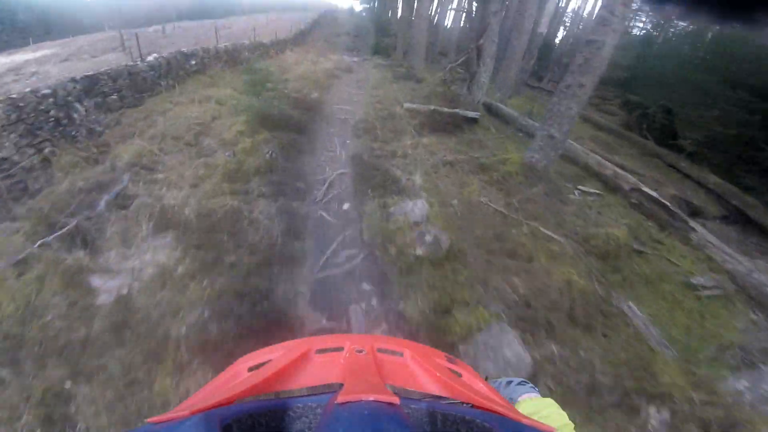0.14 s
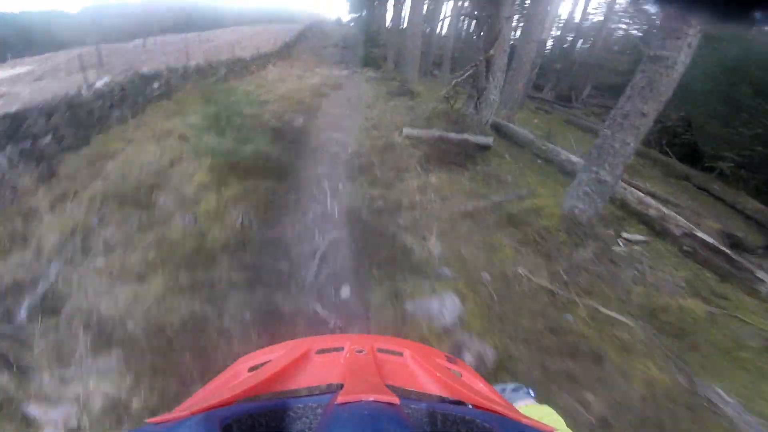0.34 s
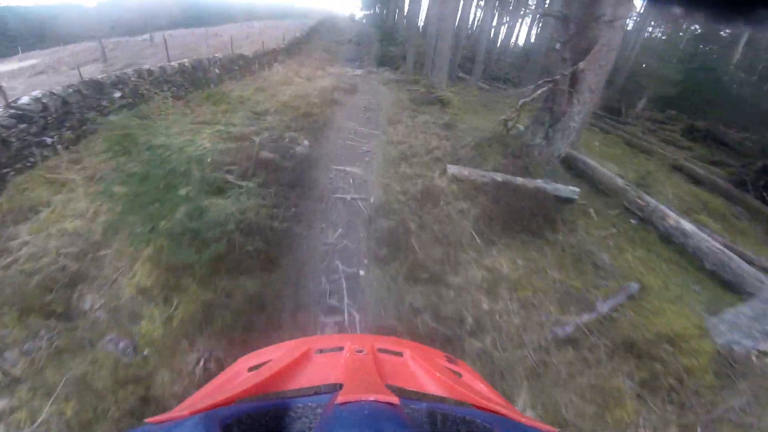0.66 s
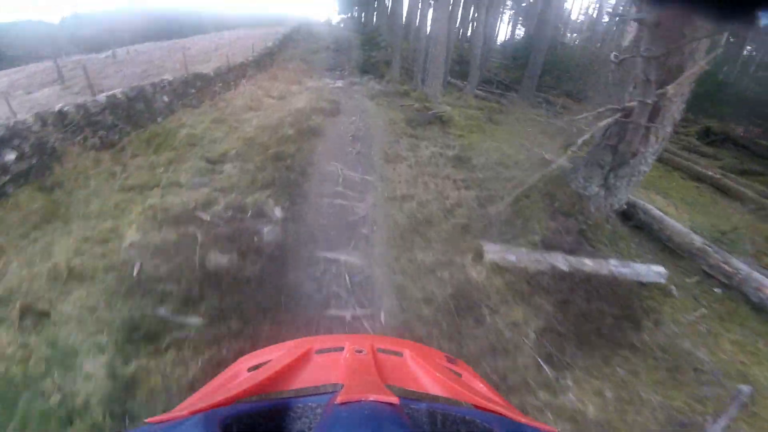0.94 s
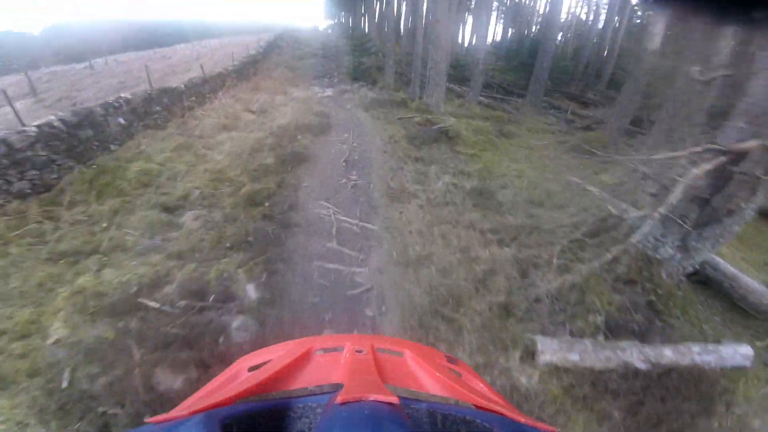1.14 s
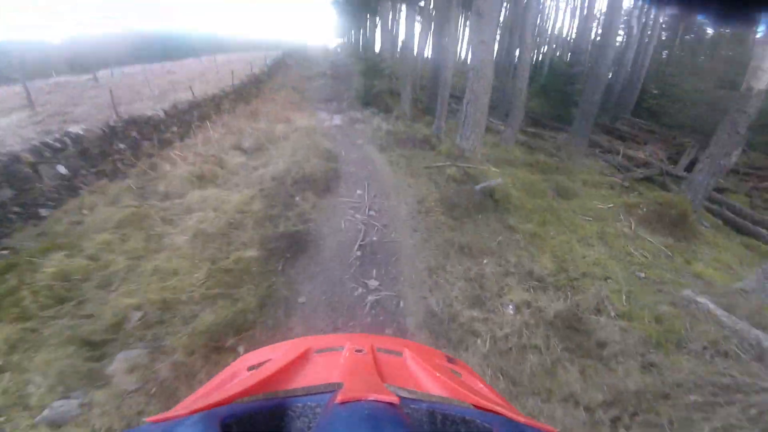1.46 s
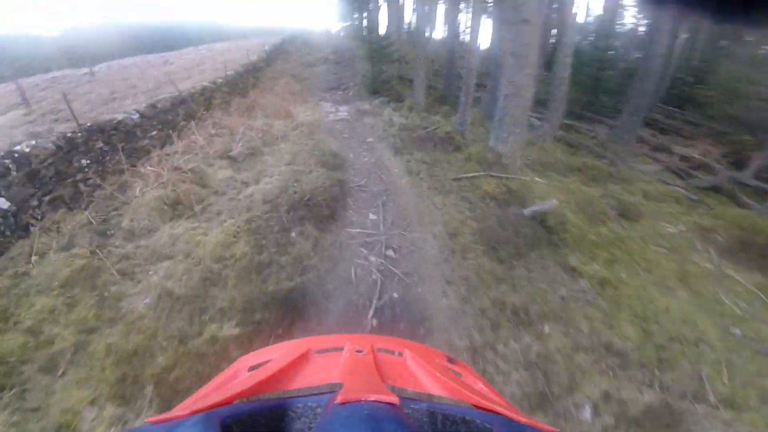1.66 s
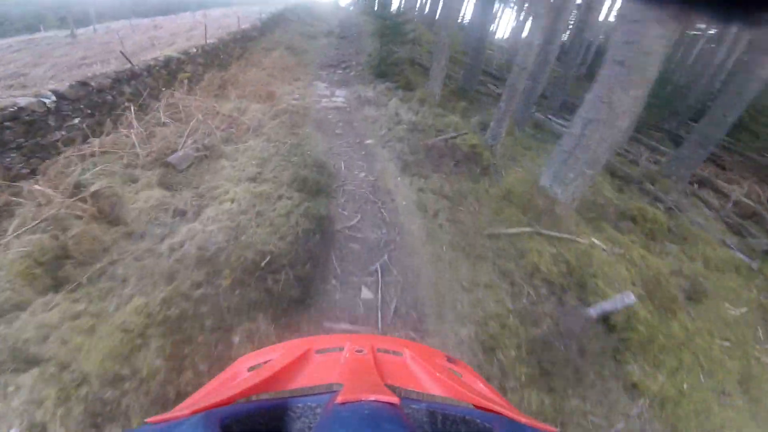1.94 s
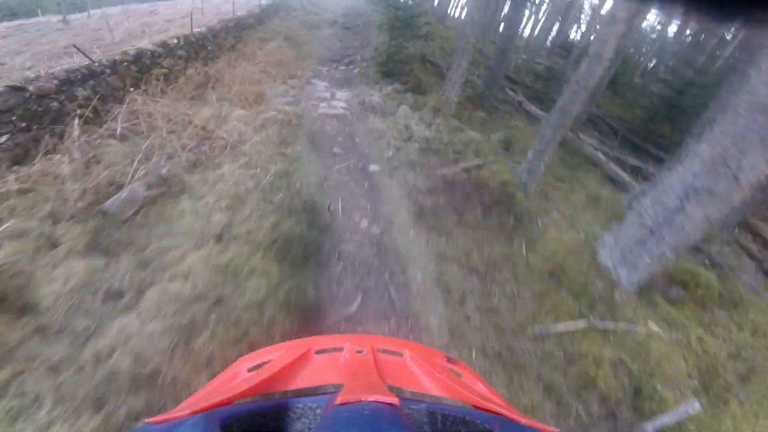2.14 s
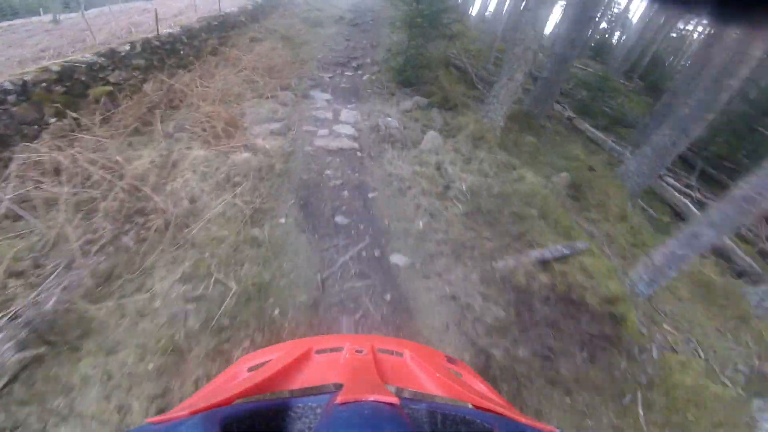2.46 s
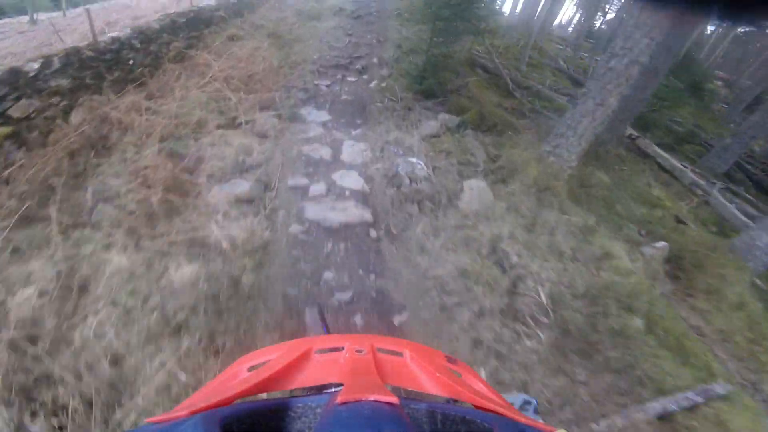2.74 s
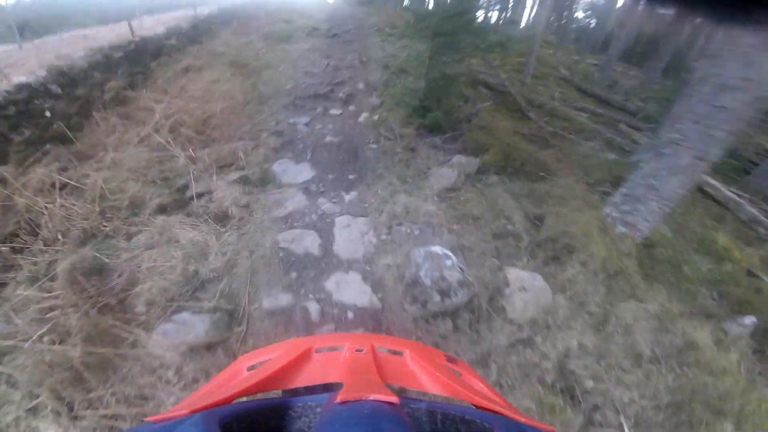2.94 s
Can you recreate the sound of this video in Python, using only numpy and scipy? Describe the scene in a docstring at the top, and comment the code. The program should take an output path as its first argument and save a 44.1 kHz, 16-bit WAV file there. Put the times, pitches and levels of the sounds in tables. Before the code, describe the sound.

Mountain bike ride over roots and stones, with chain clatter, gritty scuffs and hollow thumps

```python
"""Mountain bike on a stony trail

A mountain bike runs down a stony dirt trail, heard from the rider's helmet. Filtered noise, grains and
pebble clicks make the tyre crunch; the tyres scuff in swells of grit, and stones crack and ring briefly.
Bumps ring low modes of the microphone's case, and chain and fittings clatter and fizz over a rumble of
wind and shaking. The spectra carry the microphone's case, which rings near 6.5 kHz."""
import sys
import numpy as np
from scipy import signal
from scipy.fft import rfft, irfft, next_fast_len
from scipy.io import wavfile
from scipy.ndimage import uniform_filter1d, map_coordinates

SR = 44100
rng = np.random.default_rng(int(sys.argv[2]) if len(sys.argv) > 2 else 0)


def materialize(psi):
    """Save the field psi as 16-bit PCM at rate SR to the path in sys.argv[1].

    A 1-D psi becomes a single channel; in a 2-D psi each row is a channel.
    """
    bounded = np.clip(np.atleast_2d(psi).T, -1, 1)
    quanta = np.round(bounded * 32767).astype(np.int16)
    wavfile.write(sys.argv[1], SR, quanta)


N = 136710  # length [samples]
TOP_HZ = 15200  # upper band limit

# spectrum of dirt and small stones under the tread: (frequency [Hz], relative level [dB])
GRIT_SPECTRUM = [(150, -5), (400, 6.5), (700, 7.5), (1150, 2.5), (1600, 3.5), (2200, 4), (3000, -1),
                 (4100, -9), (5500, -16), (8000, -5), (10500, -41), (15000, -75)]
# spectrum of the hollow drone of the rolling bike: (frequency [Hz], relative level [dB])
ROLL_SPECTRUM = [(60, 5.5), (115, 8), (170, 3), (218, 3), (265, -5.5), (315, -6.5), (358, -3), (420, -12),
                 (700, -40), (1500, -55)]


def amp(db):
    """Decibels to gain."""
    return 10 ** (np.asarray(db) / 20)


def unit(x):
    """Scale to rms 1."""
    return x / np.sqrt(np.mean(x ** 2) + 1e-20)


def curve(rows):
    """One value per sample, in straight lines between (time [s], value) rows."""
    return np.interp(np.arange(N) / SR, *np.transpose(rows))


def wobble(rate):
    """A smooth random curve through `rate` random knots a second."""
    knots = rng.standard_normal(int(N * rate / SR) + 4)
    return map_coordinates(knots, [np.arange(N) * rate / SR])


def gains(points, size):
    """Gain on an FFT grid, from (frequency [Hz], level [dB]) points joined over log frequency."""
    hz, db = np.transpose(points)
    grid_hz = np.fft.rfftfreq(size, 1 / SR)
    return amp(np.interp(np.log(grid_hz + 1), np.log(hz + 1), db))


def coloured(x, points):
    """x filtered by the given spectrum, at rms 1."""
    size = next_fast_len(N + SR // 2)
    return unit(irfft(rfft(x, size) * gains(points, size), size)[:N])


def response(points, size=2048):
    """Minimum-phase impulse response of a spectrum, peak 1: a single sharp contact."""
    cepstrum = irfft(np.log(gains(points, size)))
    # folding the cepstrum forward in time makes the response causal
    cepstrum[1:size // 2] *= 2
    cepstrum[size // 2 + 1:] = 0
    impulse = irfft(np.exp(rfft(cepstrum)))
    return impulse / np.abs(impulse).max()


def grains(rate, spread_db):
    """Random tiny impacts of uneven size and either sign, `rate` a second on average, rms 1."""
    size_db = abs(spread_db) * np.clip(rng.standard_normal(N), -2, 2)
    size = amp(size_db) * rng.choice([-1, 1], N)
    return unit(size * (rng.random(N) < rate / SR))


def wavering(x, share, rate):
    """x read at an uneven speed, so that its pitch drifts by a small share."""
    speed = 1 + share * wobble(rate)
    return map_coordinates(x, [np.cumsum(speed)], mode="mirror")


def add(track, s, sound):
    """Mix a sound into the track at time s."""
    part = track[max(round(s * SR), 0):][:len(sound)]
    part += sound[:len(part)]


def tyres(bed_db=-3.0, grain_db=-3.0, pebble_db=-5, flutter_db=1.36):
    """Tread crushes dirt: a noise bed, a crackle of single grains and clicking pebbles share one level."""
    # tyre crunch: (time [s], level [dB])
    crunch_level = [(0.0, -52), (0.27, -57.5), (0.43, -55), (0.71, -56), (1.18, -54), (1.48, -55.5),
                    (1.57, -49.5), (1.79, -54), (1.95, -55), (2.15, -54.5), (2.51, -53), (3.1, -52.5)]
    crush = amp(bed_db) * coloured(rng.standard_normal(N), GRIT_SPECTRUM)
    impacts = grains(rate=600, spread_db=1)
    crackle = amp(grain_db) * unit(signal.fftconvolve(impacts, response(GRIT_SPECTRUM))[:N])
    level = amp(curve(crunch_level) + flutter_db * wobble(30.14))
    return level * (crush + crackle + amp(pebble_db) * pebbles())


def pebbles(spread_db=4):
    """Small stones click together, each a fast-dying sine at its own pitch; rms 1."""
    count, per_second = 2000, 260
    centre_hz, pitch_spread = 1722, 0.269  # spread in log pitch
    decay_cycles = 5.5  # cycles to fade by 1/e
    gap = rng.exponential(size=count)
    start = (np.cumsum(gap) * SR / per_second).astype(int)
    hz = centre_hz * np.exp(pitch_spread * rng.standard_normal(count))
    cycles = hz[:, None] * np.arange(SR // 50) / SR
    size = amp(spread_db * np.clip(rng.standard_normal(count), -2, 2))
    clicks = size[:, None] * np.sin(2 * np.pi * cycles) * np.exp(-cycles / decay_cycles)
    places = start[:, None] + np.arange(cycles.shape[1])
    return unit(np.bincount(places.ravel(), clicks.ravel(), N)[:N])


def scuffs():
    """Tyres scuff over grit: short bell-shaped swells of dense grains with fizz and a rasping resonance."""
    # (time of peak [s], level [dB], half length as Gaussian sigma [s], rasp pitch [Hz], fizz level [dB])
    scuff_events = [(0.124, -37, 0.014, 1540, -8.5), (0.373, -43.5, 0.017, 1840, -6),
                    (0.582, -44.5, 0.018, 1580, -12.5), (0.66, -47.5, 0.044, 1650, -16),
                    (0.751, -45.5, 0.014, 1860, -11), (0.903, -54.5, 0.033, 1700, -14),
                    (1.001, -46, 0.021, 1900, -13), (1.137, -43, 0.0089, 1200, -10),
                    (1.2, -50.5, 0.015, 1510, 0), (1.401, -47, 0.023, 1980, -2.5),
                    (1.6, -38.5, 0.0072, 1410, -16), (1.656, -44, 0.015, 1230, -10),
                    (1.699, -40.5, 0.026, 1365, -2.5), (2.063, -47.5, 0.032, 1540, -6),
                    (2.221, -44, 0.056, 1480, -9), (2.769, -40.5, 0.0075, 2600, -7.5),
                    (2.888, -46.5, 0.019, 2100, -5.5), (2.948, -46.5, .008, 2200, -1),
                    (3.042, -46, 0.047, 1990, -6)]
    # treble fizz: (frequency [Hz], relative level [dB])
    fizz_spectrum = [(3000, -33), (5800, -10), (6500, 5.5), (7400, 0), (8700, -1), (9500, -10.5),
                     (10300, -49), (15000, -58)]
    grit_db, rasp_db = -8, -7
    rasp_width_hz = 250  # to either side
    t, out = np.arange(N) / SR, np.zeros(N)
    grit = amp(grit_db) * coloured(grains(rate=1200, spread_db=3), GRIT_SPECTRUM)
    fizz = coloured(grains(rate=3200, spread_db=2.5), fizz_spectrum)
    slips = grains(rate=700, spread_db=3.0)
    for s, db, half, hz, fizz_db in scuff_events:
        band = [hz - rasp_width_hz, hz + rasp_width_hz]
        rasp = unit(signal.sosfilt(signal.butter(2, band, "bandpass", fs=SR, output="sos"), slips))
        swell = amp(db) * np.exp(-((t - s) / half) ** 2 / 2)
        out += swell * (grit + amp(fizz_db) * fizz + amp(rasp_db) * rasp)
    return out


def stones():
    """Stones knock on rim and frame: a dry crack, a scrape of grit and a very short ring."""
    # (time [s], level [dB], pitch [Hz], time to fall 60 dB [s])
    knocks = [(.0763, -32.5, 2200, 0.0028), (.185, -33.5, 1820, 0.0063), (0.239, -38, 910, 0.0077),
              (.345, -38, 754, .02), (.672, -42, 1670, 0.01), (0.786, -25.5, 760, 0.0046),
              (0.845, -38, 2000, 0.0049), (1.011, -37.5, 2300, 0.014), (1.133, -35.5, 1520, .008),
              (1.2404, -42, 1600, .008), (1.362, -40, 2250, 0.018), (1.387, -32.5, 2080, .016),
              (1.419, -39, 734, 0.03), (1.4387, -35.5, 2200, 0.0051), (1.494, -36, 890, 0.03),
              (1.671, -38.5, 1060, .01), (1.6995, -32, 2340, 0.01), (1.701, -36, 1350, .012),
              (1.7451, -25.5, 1710, 0.014), (1.7505, -29, 1670, 0.012), (1.756, -37, 1730, 0.035),
              (1.767, -28, 1920, 0.0023), (1.976, -40, 1500, .008), (2.016, -38, 1890, 0.016),
              (2.271, -33.5, 2270, 0.016), (2.301, -40, 2420, 0.031), (2.597, -40.5, 1260, 0.0088),
              (2.647, -38, 1700, 0.014), (2.6583, -25, 1720, 0.0047), (2.702, -35.5, 1400, 0.0077),
              (2.780, -30, 2270, 0.012), (2.8138, -28.5, 780, 0.0081), (2.849, -36.5, 2960, 0.011),
              (2.862, -36.5, 1900, 0.011), (2.910, -36.5, 2080, 0.0067), (2.939, -36.5, 1560, 0.012),
              (2.9657, -28.5, 2220, 0.003), (2.9975, -26, 2830, 0.0062), (3.008, -34.5, 1950, 0.017),
              (3.072, -36.5, 1490, 0.0077)]
    # crack: (frequency [Hz], relative level [dB])
    crack_spectrum = [(100, -31), (400, -4), (800, -1), (1700, 2.5), (2600, 1.5), (3400, -4), (4400, -13.5),
                      (6500, 1), (8500, -27), (10300, -41), (15000, -48)]
    ring_db, crack_db, scrape_db = -0.5, -15, -8.5  # against the knock's level
    scrape_share = 0.54  # 1/e decay of the scrape, as a share of the ring's 60 dB time
    crack_reach = 2.5  # contact's upper edge over the pitch: low-pitched stones sound dull
    out, t = np.zeros(N), np.arange(4096) / SR
    crack = response(crack_spectrum, size=4096)
    for s, db, hz, t60 in knocks:
        ring = np.sin(2 * np.pi * hz * t) * amp(-60 * t / t60)
        grit = unit(signal.fftconvolve(rng.standard_normal(len(t)), crack)[:len(t)])
        scrape = grit * np.exp(-t / (scrape_share * t60))
        lowpass = signal.butter(2, min(crack_reach * hz, TOP_HZ), fs=SR)
        contact = signal.lfilter(*lowpass, amp(crack_db) * crack + amp(scrape_db) * scrape)
        add(out, s, amp(db) * (amp(ring_db) * ring + contact))
    return out


def bumps():
    """Roots and rocks hit the wheels: blow and judder ring the case, heave the rider and crush grit."""
    # (time [s], level [dB], 1/e length of the judder [s], hardness as tilt of the modes [dB per octave])
    hits = [(.239, -34.5, 0.0026, 10.5), (.29, -32.5, 0.019, -10.5), (0.346, -41.5, 0.0065, 11),
            (.364, -31, 0.0073, 2), (0.469, -38.5, 0.013, -1), (0.578, -36.5, 0.016, -1),
            (0.759, -27, 0.0049, -4), (1.01, -31, 0.0058, -5.5), (1.119, -27.5, 0.0057, -2),
            (1.147, -32.5, 0.011, -3), (1.245, -35.5, 0.025, 0), (1.344, -26, 0.0055, -5.5),
            (1.396, -22, 0.014, -4), (1.506, -31, 0.011, 0), (1.62, -30, 0.013, -1), (1.655, -25, 0.033, 5),
            (1.76, -28.5, 0.0077, -10), (2.006, -30.5, 0.02, 5.5), (2.223, -28.5, 0.078, 1.5),
            (2.414, -32.5, 0.0043, -4.5), (2.438, -27.5, 0.027, 0), (2.486, -34.5, 0.0068, -2),
            (2.539, -25.5, 0.012, -6), (2.588, -33, 0.0056, 8), (2.779, -29.5, 0.0038, 0.5),
            (2.814, -23.5, 0.0096, 4.5), (2.828, -31.5, 0.0092, 4), (2.924, -29, 0.0089, -1),
            (2.951, -28, 0.01, -2), (2.988, -33, 0.033, 0)]
    # low modes of the microphone's case: (frequency [Hz], level before tilt [dB], time to fall 60 dB [s])
    case_modes = [(117.7, 2.5, 0.066), (168.5, 0, 0.053), (217.4, -0.5, 0.12), (282, -7, 0.051),
                  (352.4, -5.5, 0.08)]
    crushed_spectrum = [(200, -25), (500, 10), (900, 6.5), (2000, -12), (4000, -5.5), (12000, -70)]
    bump_db, jolt_db = -1.5, -0.5  # thud and heave against the hit's level; judder against the blow
    heave_hz, heave_s, heave_db = 51.6, 0.02, 3  # 1/e decay; level against the thud
    detune, uneven_db = 0.024, 2.1  # the modes shift in pitch (as a share) and level from blow to blow
    spray_s, spray_db = 0.01, -20.5  # crushed grit, 1/e decay
    tremble_s, tremble_db = 0.025, -17.5  # the bike goes on shaking, 1/e decay
    out, spray, tremble = np.zeros(N), np.zeros(N), np.zeros(N)
    t = np.arange(SR // 3) / SR
    heave = amp(heave_db) * np.sin(2 * np.pi * heave_hz * t) * np.exp(-t / heave_s)
    for s, db, length, hardness in hits:
        judder = rng.standard_normal(len(t)) * np.exp(-t / length)
        push = amp(jolt_db) * judder / np.linalg.norm(judder)
        push[0] += 1  # the blow itself
        ring = np.zeros(len(t))
        for k, (hz, level, t60) in enumerate(case_modes):
            mode_db = level + hardness * np.log2(hz) + rng.normal(0, uneven_db)
            mode_hz = hz * (1 + detune * rng.standard_normal())
            # neighbouring modes have opposite sign
            ring += (-1) ** k * amp(mode_db - 60 * t / t60) * np.sin(2 * np.pi * mode_hz * t)
        thud = signal.fftconvolve(push, ring)[:len(t)]
        add(out, s, amp(db + bump_db) * (thud / np.abs(thud).max() - heave))
        add(spray, s, amp(db + spray_db) * np.exp(-t / spray_s))
        add(tremble, s, amp(db + tremble_db) * np.exp(-t / tremble_s) * (1 - np.exp(-t / length)))
    grit = coloured(grains(rate=1500, spread_db=4.0), crushed_spectrum)
    shaking = coloured(rng.standard_normal(N), ROLL_SPECTRUM)
    return out + spray * grit + tremble * shaking


def clinks():
    """Chain and fittings strike: one contact, the ping of a small part and a dying chatter of links."""
    # (time [s], level [dB], 1/e length of the chatter [s])
    strikes = [(.043, -30.5, 0.0012), (0.078, -36.5, 0.0065), (0.112, -29, 0.003), (0.3692, -35.5, 0.0045),
               (.441, -38, 0.005), (1.0096, -31, 0.0078), (1.124, -36, 0.0022), (1.1315, -30.5, .003),
               (1.361, -19.5, 0.0036), (1.365, -35, 0.014), (1.3865, -24.5, 0.007), (1.5815, -30.5, 0.0025),
               (1.585, -32, 0.012), (1.6983, -22, 0.0016), (1.717, -33, 0.0018), (1.7452, -20, 0.00053),
               (1.749, -33, 0.0037), (1.76, -35.5, 0.0063), (1.768, -30.5, 0.0071), (2.039, -25, 0.00059),
               (2.0417, -32.5, 0.006), (2.174, -32.5, 0.0065), (2.2701, -22, 0.0051), (2.5498, -28, 0.004),
               (2.559, -28.5, 0.0035), (2.6273, -23.5, 0.0062), (2.6434, -29.5, 0.0073),
               (2.6578, -19.5, 0.0018), (2.664, -28, 0.0038), (2.718, -34, 0.0052), (2.779, -22.5, 0.0057),
               (2.788, -33, 0.0066), (2.849, -35.5, 0.0096), (2.86, -34, 0.006), (2.939, -33, .003),
               (2.949, -31, .002), (2.9804, -25.5, 0.0013), (3.010, -26.5, 0.0015)]
    # metal contact: (frequency [Hz], relative level [dB])
    metal_spectrum = [(200, -32), (600, -18), (1300, -14), (2300, -13.5), (3300, -17), (4400, -23),
                      (5800, -15), (6230, -1.5), (6500, 8.5), (7050, -5), (8400, -10.5), (9400, -30),
                      (10300, -60), (13500, -35), (15500, -60)]
    contact_db, chatter_db, ping_db = -8, -5.5, -10.5  # against the strike's level
    ping_hz, ping_spread = 7330, 0.076  # spread in log pitch: each strike rings a different small part
    ping_t60 = 0.012  # time to fall 60 dB [s]
    out, t = np.zeros(N), np.arange(SR // 10) / SR
    contact = response(metal_spectrum)
    for s, db, length in strikes:
        links = rng.standard_normal(len(t)) * (rng.random(len(t)) < 4000 / SR)  # 4000 a second
        chatter = unit(signal.fftconvolve(links, contact)[:len(t)])
        chatter *= np.exp(-t / length) * (1 - np.exp(-t / 0.00034))  # soft onset
        hz = ping_hz * np.exp(ping_spread * rng.standard_normal())
        ping = np.sin(2 * np.pi * hz * t) * amp(-60 * t / ping_t60)
        ping *= 1 - np.exp(-t / 0.00031)
        add(out, s, amp(db + contact_db) * contact)
        add(out, s, amp(db) * (amp(chatter_db) * chatter + amp(ping_db) * ping))
    return out


def running_rattle(bed_db=-1, grain_db=-3, flutter_db=-0.65):
    """Ceaseless fine ticking and fizz of the drive train: noise and grains, slightly wavering in pitch."""
    # running rattle: (time [s], level [dB])
    rattle_level = [(0.0, -52), (0.19, -52.5), (0.95, -55.5), (1.44, -55), (1.55, -53.5), (1.84, -55),
                    (2.59, -52.5), (2.77, -52.5), (3.1, -49.5)]
    # drive train fizz: (frequency [Hz], relative level [dB])
    fizz_spectrum = [(2000, -28), (4200, -19.5), (5900, -10), (6250, -7), (6490, 8), (6850, -1), (7600, -3),
                     (8600, -7), (9400, -12), (10200, -21.5), (12000, -21.5), (13500, -33), (15500, -70)]
    fizz = amp(bed_db) * coloured(rng.standard_normal(N), fizz_spectrum)
    impacts = grains(rate=350, spread_db=0.5)
    ticks = amp(grain_db) * unit(signal.fftconvolve(impacts, response(fizz_spectrum))[:N])
    level = amp(curve(rattle_level) + flutter_db * wobble(30.0))
    return level * wavering(fizz + ticks, share=.009, rate=25)


def rumble(db=0, roll_db=-44, roll_follows=0.31):
    """Wind and shaking at the helmet as deep noise, with the hollow drone of the rolling bike."""
    # rumble: (time [s], level [dB])
    shake_level = [(0.0, -35), (0.29, -32), (1.29, -29.5), (1.32, -41.5), (1.4, -34), (1.57, -23.5),
                   (1.62, -31.5), (1.8, -23), (1.88, -32.5), (2.04, -24.5), (2.07, -30), (2.62, -25.5),
                   (2.87, -21), (2.98, -30), (3.0, -25.5), (3.1, -26.5)]
    # wind and shaking: (frequency [Hz], relative level [dB])
    rumble_spectrum = [(5, -0.5), (12, 0), (24, 4), (42, -4.5), (68, -7), (92, -19), (130, -36), (220, -63),
                       (600, -106), (1500, -110)]
    level_db = curve(shake_level)
    low = coloured(rng.standard_normal(N), rumble_spectrum)
    # partly even out the noise's own swells, so that the level curve leads
    power = np.abs(uniform_filter1d(low ** 2, size=5000))
    low = unit(low / np.sqrt(power + .2))
    roll = coloured(rng.standard_normal(N), ROLL_SPECTRUM)
    # the drone follows only a share of the rumble's level changes in dB
    roll_level = amp(roll_follows * (level_db - level_db.mean()) + roll_db)
    lurch = amp(1.5 * wobble(14))  # quick surges
    return lurch * (amp(level_db + db) * low + roll_level * roll)


def scene():
    """The layers add up in one channel, as everything rides along with the microphone."""
    ground = tyres() + scuffs() + stones()
    bike = bumps() + clinks() + running_rattle()
    return (ground + bike + rumble())[None]


def record(dry):
    """A steep low-pass keeps almost nothing above the band limit; the sound eases in and out."""
    fade_s = .006
    t = np.arange(N) / SR
    edge = np.minimum(t, t[::-1])  # time to the nearer end
    ease = np.sin(np.pi / 2 * np.clip(edge / fade_s, 0, 1)) ** 2
    return signal.sosfilt(signal.butter(16, TOP_HZ, fs=SR, output="sos"), dry * ease)


dry = scene()
out = record(dry)
materialize(out)
```